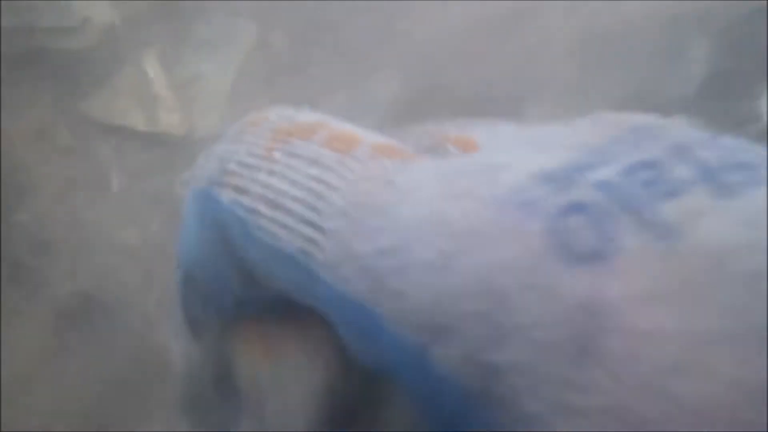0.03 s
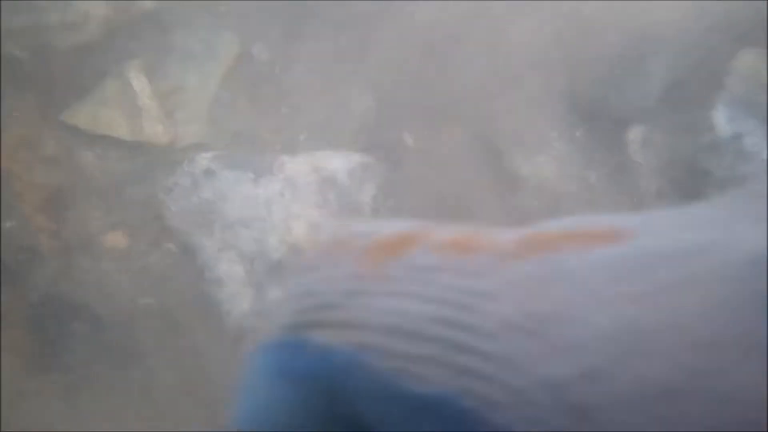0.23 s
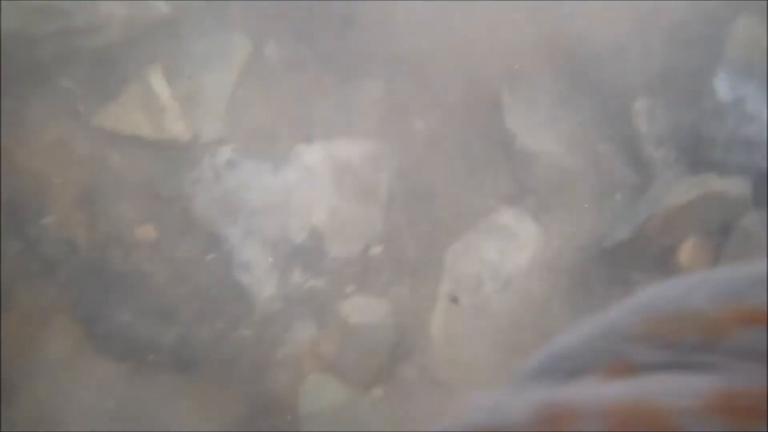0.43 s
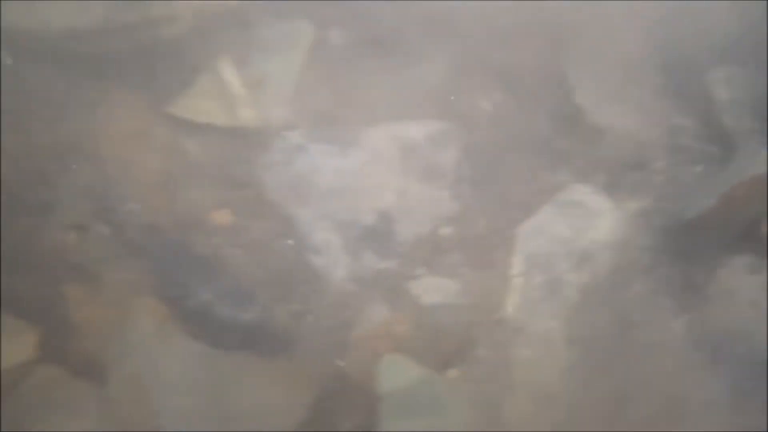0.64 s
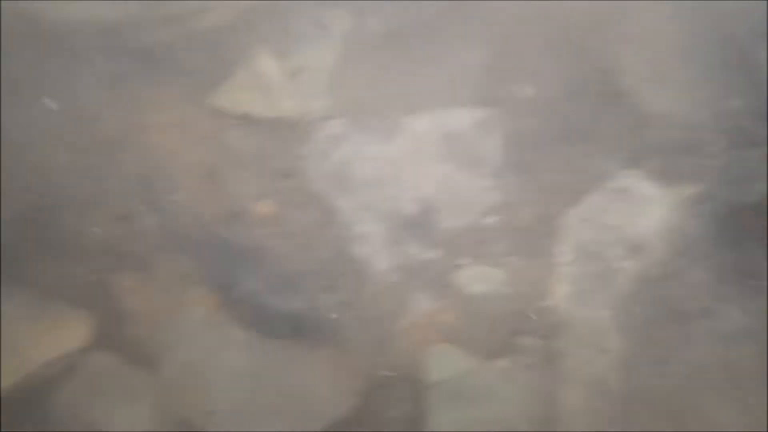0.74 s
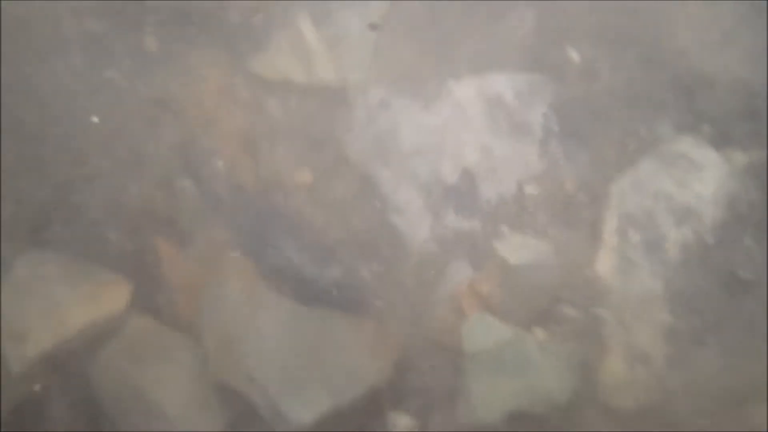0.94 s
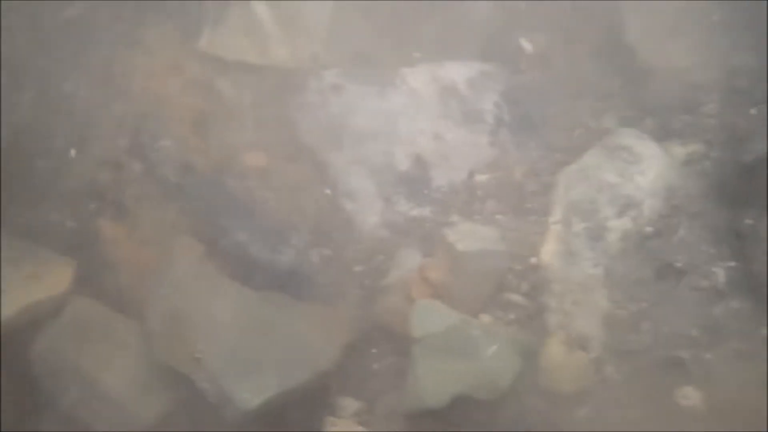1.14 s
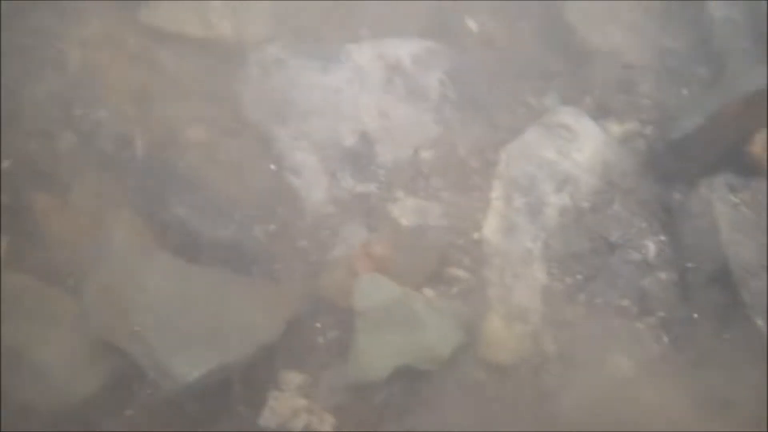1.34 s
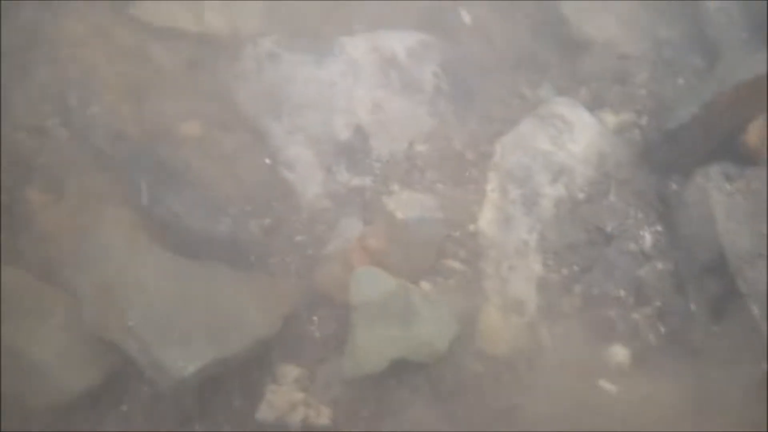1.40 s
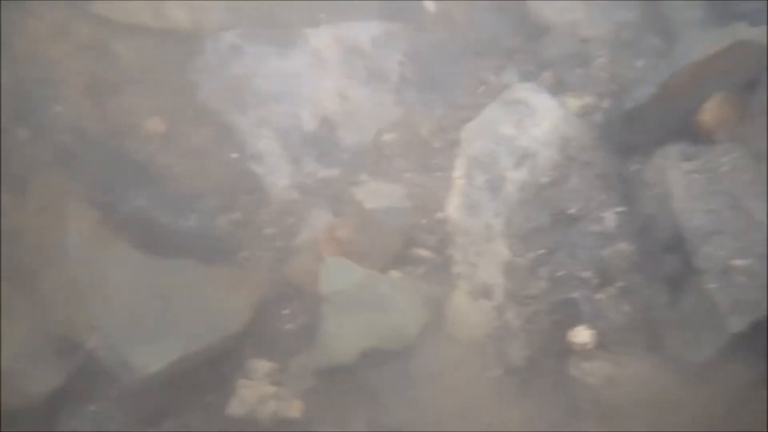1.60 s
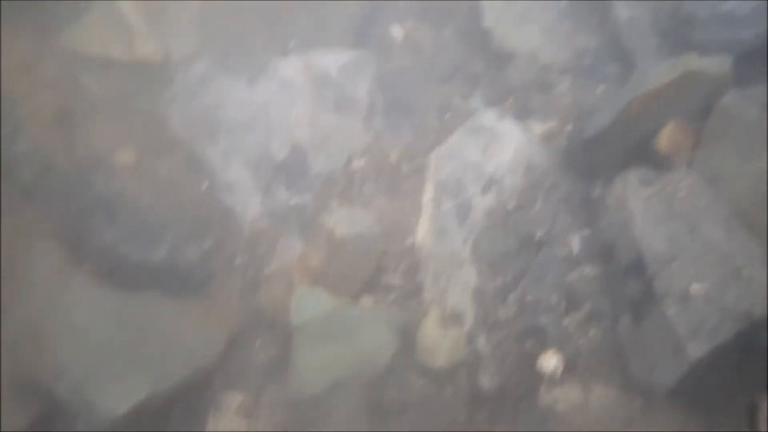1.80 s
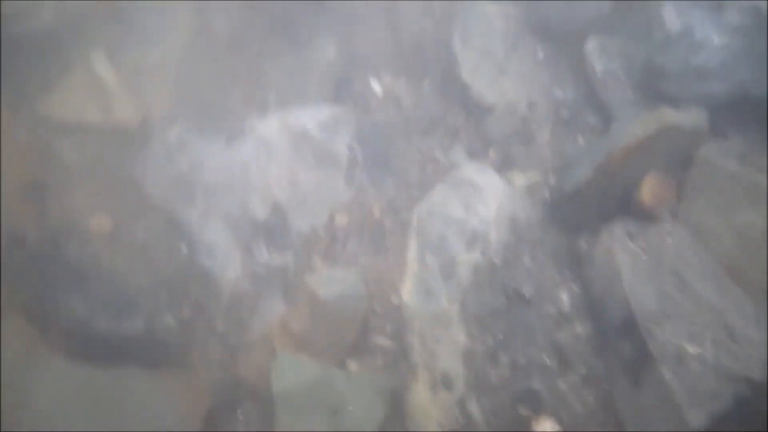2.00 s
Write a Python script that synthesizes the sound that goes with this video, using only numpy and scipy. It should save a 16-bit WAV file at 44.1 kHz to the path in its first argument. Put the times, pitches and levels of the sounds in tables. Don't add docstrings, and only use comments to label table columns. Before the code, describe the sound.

Stones knock and clatter dully underwater as a gloved hand stirs creek gravel, over low water rumble

```python
import sys
import numpy as np
from scipy import signal
from scipy.fft import rfft, irfft
from scipy.io import wavfile

SR = 44100
rng = np.random.default_rng(int(sys.argv[2]) if len(sys.argv) > 2 else 0)


def to_wav(s):
    ch = np.atleast_2d(s).T
    pcm = np.round(np.clip(ch, -1, 1) * 32767)
    wavfile.write(sys.argv[1], SR, pcm.astype(np.int16))


def how_loud(loudness_db):
    steps = np.asarray(loudness_db, float) / 20
    return 10 ** steps


N = 90625

# time in seconds, water push in dB, glove rub in dB.
HAND = [(0,-33,-65.5), (0.118,-29.5,-64.5), (.31,-22.5,-51.5), (0.36,-29.5,-63), (0.442,-16.5,-53),
        (0.463,-33.5,-72), (0.632,-51,-83.5), (0.868,-57.5,-95.5), (.92,-29.5,-73), (1.11,-41.5,-85),
        (1.213,-37.5,-66), (1.231,-49,-85.5), (1.372,-28,-67), (1.503,-42.5,-78.5), (1.752,-47,-78),
        (1.778,-30,-68.5), (2.05,-37.5,-72.5)]
# frequency in Hz, level in dB per Hz.
HISS_COLOUR = [(1200, 3), (5000, -4.5), (15000, -2.5)]
# frequency in Hz, level in dB per Hz.
RUMBLE_COLOUR = [(15, -21), (25, 1), (81, -1.5), (145, -7), (300, -25), (390, -53), (660, -120)]
# start in seconds, level in dB, frequency in Hz.
SHOVES = [
    (0.17,-19.5,90.4),
    (0.289,-11.5,74.4),
    (0.324,-16.5,82.4),
    (0.4,-14.5,87.5),
    (0.987,-35,100.5),
    (1.43,-22,104),
    (1.82,-27.5,80.2),
    (1.881,-25.5,72.3),
]
# start in seconds, level in dB, fading time in seconds, colour in Hz.
GRIT_TICKS = [(.008,-40,0.0012,4470), (0.0747,-44,.0007,6060), (0.089,-42,.001,8500), (.106,-47,.001,7050),
              (.1236,-50,.001,6000), (.1346,-51,.001,8200), (0.149,-39.5,0.0026,5900),
              (0.163,-44,0.0024,8300), (0.246,-44,0.0023,8000), (.272,-38,.002,7500),
              (0.331,-39,0.0017,7800), (0.512,-41,0.0011,6500), (.903,-55.5,0.0011,2900),
              (0.965,-44,0.0012,5000), (1.172,-54,0.0012,8200), (1.195,-50.5,.002,8300),
              (1.567,-47.5,.001,2880), (1.65,-49,0.0016,2340), (0.445,-43,0.0022,5100),
              (0.215,-36,0.0023,8300), (0.285,-33,0.0036,7400), (0.294,-31,0.0023,8300),
              (0.313,-37,0.0039,7260), (0.399,-42,0.003,5950), (0.426,-31,0.0042,5070),
              (0.44,-33,0.0018,6070), (.526,-36.5,0.0032,8100), (0.577,-33.5,0.0016,5500),
              (0.993,-45,0.0039,8000), (1.056,-47,0.0033,8300), (1.206,-44.5,0.0038,8300),
              (1.275,-47,0.0021,4650), (1.31,-43,0.0037,5900), (1.344,-39,0.0021,6950),
              (1.769,-42,0.0064,7340), (1.813,-28.5,0.0022,3600), (0.986,-46,.001,7000),
              (1.004,-55,0.0018,7400), (1.023,-50.5,.001,3900), (1.048,-50,0.0025,8300),
              (1.158,-53.5,.003,8400)]
# time in seconds, ring in dB, then thump and click in dB above the ring.
KNOCKS = [(0.019, -25.5, -6, -26), (0.216, -24.5, 9.5, -50), (0.249, -24, 7, -44), (0.291, -16, -1, -44),
          (0.307, -37, -17, -41), (0.3195, -14, -0.5, -46), (0.329, -14.5, 1.5, -49),
          (0.334, -19.5, -24, -48), (0.363, -29, -6, -16), (0.377, -25.5, 10, -48), (0.385, -24, 7, -45),
          (0.4003, -6, -28, -35), (0.4245, -21.5, -0.5, -14), (0.428, -24, -13, -25),
          (0.433, -16.5, 1, -26.5), (0.439, -3.5, -24, -17), (0.445, -17, -8.5, -41), (0.49, -30.5, 0, -30),
          (0.532, -25, 1, -15), (0.577, -12, 0.5, -14.5), (0.595, -17.5, 0, -24), (0.925, -20, -0.5, -24),
          (0.931, -27.5, 8, -38), (0.9357, -23.5, 1, -28), (0.964, -29.5, 9, -32.5), (0.992, -11.5, 3, -27),
          (1.022, -27, -15.5, -37), (1.057, -24, 0, -28), (1.17, -27, 1.5, -37.5), (1.208, -21.5, 0, -34),
          (1.308, -42, 2, -8), (1.317, -38.5, 1, -17.5), (1.343, -16.5, -21, -30.5),
          (1.347, -16.5, -23, -48), (1.351, -25.5, 12.5, -41), (1.355, -20, -22, -48),
          (1.374, -31.5, 6, -43), (1.611, -52, 13, -44), (1.772, -29.5, 8.5, -47), (1.792, -27, 6.5, -32),
          (1.814, -20, -5, -24.5), (1.91, -29, 1.5, -37)]
# time in seconds, ring in dB, thump in dB above the ring.
PEBBLES = [(0.036, -29, 4), (0.117, -37.5, 12.5), (0.152, -27.5, 4), (0.186, -31, 5), (0.605, -28.5, -6),
           (0.871, -43.5, -2), (0.889, -42, -3), (0.902, -37.5, 3.5), (0.917, -37, 3), (1.003, -36.5, 12),
           (1.087, -33.5, -3), (1.144, -38.5, 0.5), (1.198, -30.5, -4.5), (1.275, -44, 6), (1.295, -38, -5),
           (1.39, -36, 4), (1.414, -31.5, 6.5), (1.429, -31.5, 9.5), (1.462, -32, 1), (1.485, -38.5, 2.5),
           (1.569, -46.5, 7.5), (1.65, -45, -15), (1.8, -21, 1.5), (1.867, -40.5, -3), (1.881, -29.5, 1.5)]
# start in seconds, level in dB, length in seconds.
SQUEAKS = [
    (.04,-55.5,0.29),
    (.235,-46,0.11),
    (.421,-30,0.021),
    (.45,-69,.08),
    (1.12,-64.5,0.077),
    (1.18,-71,.045),
]
# start in seconds, level in dB, length in seconds.
ROLLS = [
    (0.741,-49,0.019),
    (0.781,-40.5,0.0019),
    (.66,-59.5,0.061),
    (1.546,-46,0.035),
    (1.609,-41,0.014),
    (1.903,-39,0.012),
    (1.93,-43,0.017),
    (1.984,-35.5,0.0096),
]

# frequency in Hz, time to fade by 60 dB in seconds, left level in dB, right level in dB.
THUMP_MODES = [(169, 0.038, -1, -6.5), (238.2, 0.022, -9.5, -2.5), (326, 0.012, -53.5, -25.5)]
RING_MODES = [(404, 0.032, -5.5, -6.5), (507.5, 0.011, 5.5, -19), (599.7, 0.029, 11, -14),
              (643, 0.022, 10, -21.5), (690, 0.077, -6, -21.5)]
EDGE_MODES = [(1025, 0.011, 3, -27.5), (1178, 0.017, -4, -18.5), (1400, 0.014, -17.5, -35.5)]
CLICK_MODES = [(1868, 0.02, -2, -8.5), (2418, 0.0094, -1, -9), (2720, 0.0072, -2, -13.5),
               (3770, 0.011, -2.5, -13)]
TICK_MODES = [(5360, 0.0011, 2, 8), (7350, 0.0031, 2.5, -2.5), (8300, 0.006, -2, -8),
              (10800, 0.0015, -2, -19.5), (12000, 0.0023, -2.5, -20.5)]
SQUEAK_MODES = [(8300, 0.014, 2.5, -4), (7400, 0.0039, -17.5, -15)]
HUM_MODES = [(655, .04, 0, -20)]
# frequency in Hz, width in Hz.
DEAD_SPOTS = [(1380, 34), (1600, 265), (2080, 213), (3200, 280), (4150, 110)]


def evened(x):
    return x / np.sqrt(np.mean(x ** 2) + 1e-20)


def shaped_noise(points):
    hz = np.fft.rfftfreq(N, 1 / SR) + 1
    f, db = np.transpose(points)
    beyond = np.maximum(np.maximum(hz / f[-1], f[0] / hz), 1)
    level = np.interp(np.log(hz), np.log(f), db) - 30 * np.log2(beyond)
    return evened(irfft(rfft(rng.standard_normal((2, N))) * how_loud(level), N))


def wander(per_s):
    knots = rng.standard_normal(2000)
    return np.interp(np.arange(N) * per_s / SR, np.arange(2000), knots)


def hand(column):
    rows = np.array(HAND)
    return np.interp(np.arange(N) / SR, rows[:, 0], rows[:, column])


def grains(per_s, spread_db):
    draw = rng.random((3, N))
    size = how_loud(spread_db * np.minimum(-np.log(draw[0] + 1e-9), 4))
    happens = draw[2] < per_s / SR
    return evened(size * np.sign(draw[1] - 0.5) * happens)


def apart(make, share):
    left, other = make(), make()
    return np.array([left, np.sqrt(1 - share ** 2) * left + share * other])


def strokes(rows, lean):
    t = np.arange(N) / SR
    force = np.zeros(N)
    for s, db, length in rows:
        progress = np.clip((t - s) / length, 0, 1)
        force += how_loud(db - 23) * np.sin(np.pi * progress ** lean)
    return force


def blows(times, db, count=5, less_db=0, lead_s=0):
    rattle_s, rattle_db = 0.006, -3
    out, draw = np.zeros(N + SR), rng.random((len(times), count, 3))
    np.add.at(out, np.round(times * SR).astype(int), how_loud(db))
    delay = np.cumsum(0.0006 - rattle_s * np.log(draw[..., 0] + 1e-9) / 2, axis=1)
    level = db[:, None] + rattle_db - less_db - 4.55 * draw[..., 1] - 930 * delay
    size = how_loud(level) * np.sign(draw[..., 2] - 0.5)
    start = np.maximum(times[:, None] + delay - lead_s, 0)
    np.add.at(out, np.round(start * SR).astype(int), size)
    return out[:N]


def housing(force, modes, soft_hz=None, over_hz=None):
    t = np.arange(4096) / SR
    ring = np.zeros((2, len(t)))
    for hz, t60, left_db, right_db in modes:
        ring += how_loud(np.array([[left_db], [right_db]]) - 60 * t / t60) * np.sin(2 * np.pi * hz * t)
    if soft_hz:
        ring = signal.sosfilt(signal.bessel(4, soft_hz, fs=SR, output="sos", norm="mag"), ring)
    if over_hz:
        ring = signal.sosfilt(signal.butter(3, over_hz, "high", fs=SR, output="sos"), ring)
    ring = ring / abs(ring.mean(0)).max()
    return signal.oaconvolve(np.atleast_2d(force), ring, axes=1)[:, :N]


def hiss():
    return how_loud(-80 + 0.53 * (hand(column=2) + 86.5)) * shaped_noise(HISS_COLOUR)


def water():
    a, b = shaped_noise(RUMBLE_COLOUR)
    push = 0.63 * hand(column=1) - 11.5 + 0.5 * wander(4.7)
    out = how_loud(push) * np.array([a, 1.05 * a + 0.24 * b])
    for s, db, hz in SHOVES:
        cycles = np.arange(0, 4, hz / SR)
        swell = np.minimum(4 * cycles, 1) * np.exp(-cycles / 2.12 * 2)
        shove = how_loud(db + 7) * np.sin(2 * np.pi * cycles) * swell
        part = out[:, round(s * SR):][:, :len(cycles)]
        part += shove[:part.shape[1]]
    return out * how_loud([[1.9], [-2.5]])


def glove_rub():
    fizz = apart(lambda: grains(2000, 5.5), 0.55)
    rub = how_loud(hand(column=2) + 1.7 * wander(52)) * fizz
    return housing(how_loud(-12.5) * rub, TICK_MODES, over_hz=3270)


def grit():
    force, t = np.zeros((2, N + 2000)), np.arange(2000) / SR
    sand = np.pad(apart(lambda: grains(6000, 4.0), 0.55), ((0, 0), (0, 2000)))
    for s, db, spread, hz in GRIT_TICKS:
        at = slice(round(s * SR), round(s * SR) + 2000)
        swell = np.minimum(t / 0.00076, 1) * np.exp(-t / max(spread, 0.0003))
        burst = how_loud(db - 9.0) * swell * sand[:, at]
        force[:, at] += signal.lfilter(*signal.iirpeak(hz, 1.6, fs=SR), burst)
    force = force[:, :N]
    ticks = housing(force, TICK_MODES, over_hz=3270)
    return ticks + 0.35 * housing(force, CLICK_MODES, over_hz=1470)


def stones():
    (s, db, low, top), (ps, pdb, plow) = np.transpose(KNOCKS), np.transpose(PEBBLES)
    push = hand(column=1)

    def ring_force():
        struck = blows(s, db, less_db=0.5, lead_s=0.004007) + blows(ps, pdb, lead_s=0.006)
        return struck + how_loud(push - 33.5 + 0.65 * wander(25.0)) * grains(500, 3.2)

    def click_force():
        struck = blows(s, db + top, less_db=4.0, lead_s=0.003) + blows(ps, pdb - 29)
        return struck + how_loud(push - 56.5 + 2.5 * wander(44)) * grains(1200, 6.7)

    thump = blows(s, db + low + 1.0, less_db=13.0, lead_s=0.0044) + blows(ps, pdb + plow + 3.5)
    thump += how_loud(push - 27.5) * grains(400, 3.5)
    edge = blows(s, db + 0.41 * top - 4.0, less_db=7.0) + blows(ps, pdb - 25.0)
    out = housing(thump, THUMP_MODES, soft_hz=537, over_hz=61.8)
    out += housing(apart(ring_force, 1.0), RING_MODES, soft_hz=933)
    out += housing(edge, EDGE_MODES, soft_hz=1480, over_hz=766)
    return out + housing(apart(click_force, 0.91), CLICK_MODES, over_hz=1420)


def squeaks():
    force = strokes(SQUEAKS, 1) * how_loud(2.8 * wander(90)) * grains(6600, 5.9)
    return housing(force, SQUEAK_MODES, over_hz=6500)


def rolls():
    force = strokes(ROLLS, 0.68) * grains(3000, 2.5)
    return housing(force, HUM_MODES, soft_hz=805, over_hz=435)


def late(x):
    lag_s = 0.00036
    return np.array([x[0], np.pad(x[1], (round(lag_s * SR), 0))[:N]])


def scene():
    low = late(water() + stones() + rolls())
    return hiss() + low + glove_rub() + grit() + squeaks()


def band_limit(x):
    return signal.sosfilt(signal.butter(12, 16120, fs=SR, output="sos"), x)


def record(dry):
    out = dry
    for hz, width in DEAD_SPOTS:
        out = signal.lfilter(*signal.iirnotch(hz, hz / width, fs=SR), out)
    out = signal.sosfilt(signal.butter(3, 26, "high", fs=SR, output="sos"), out)
    out = signal.sosfilt(signal.cheby1(8, 0.5, 15600, fs=SR, output="sos"), out)
    return band_limit(out)


dry = scene()
out = record(dry)
to_wav(out)
```